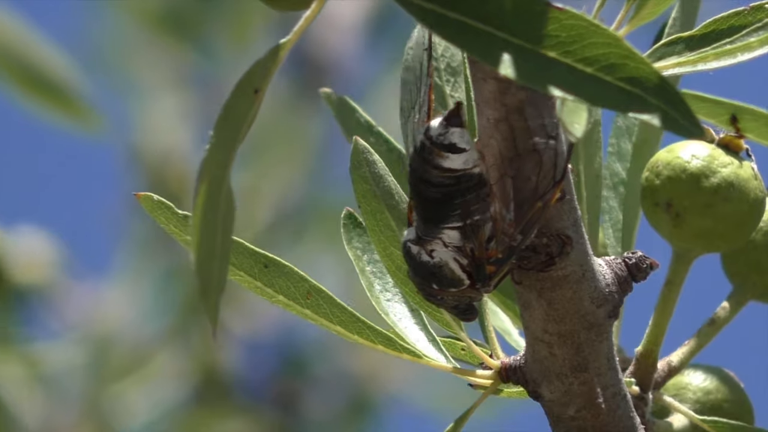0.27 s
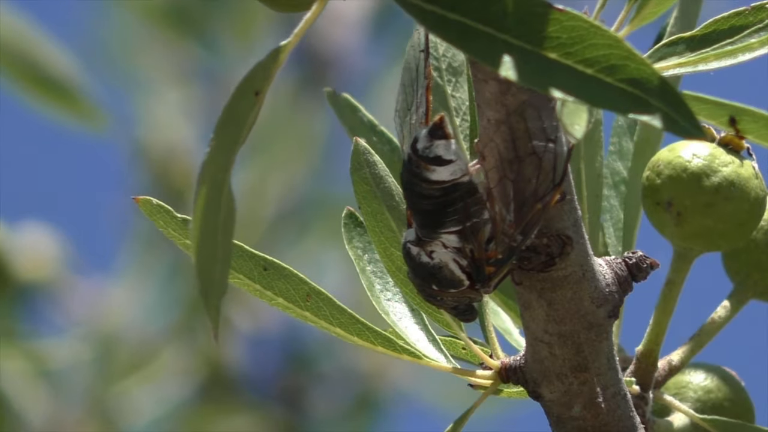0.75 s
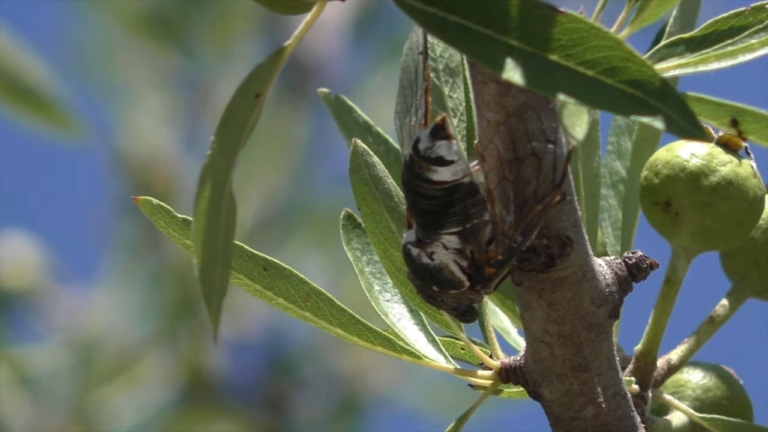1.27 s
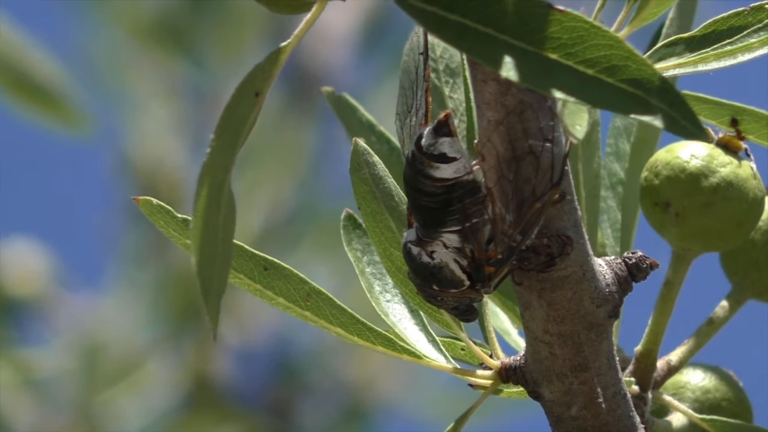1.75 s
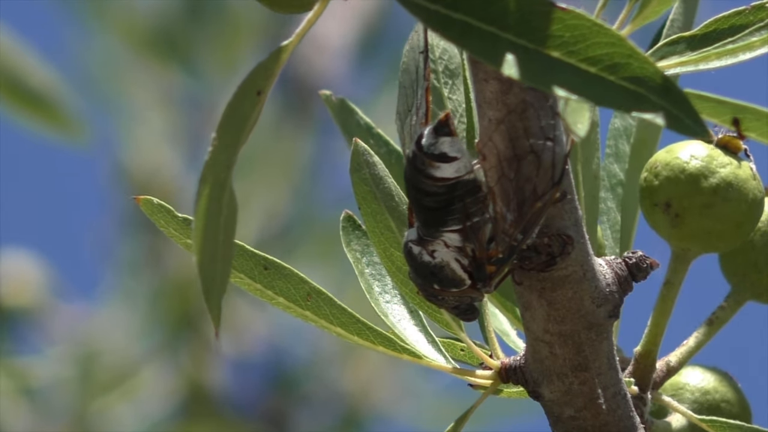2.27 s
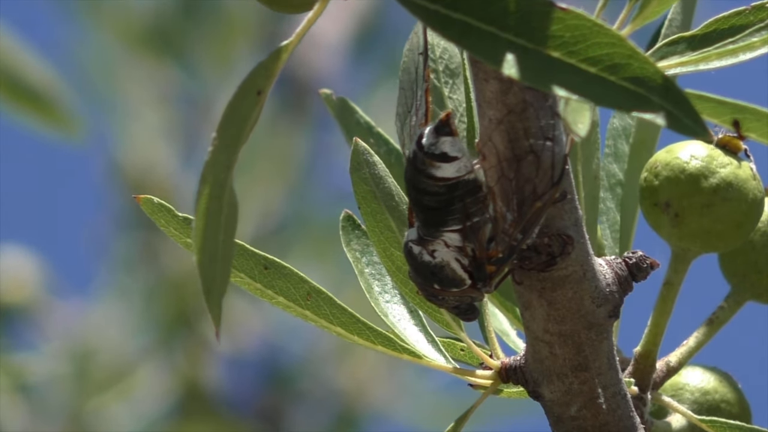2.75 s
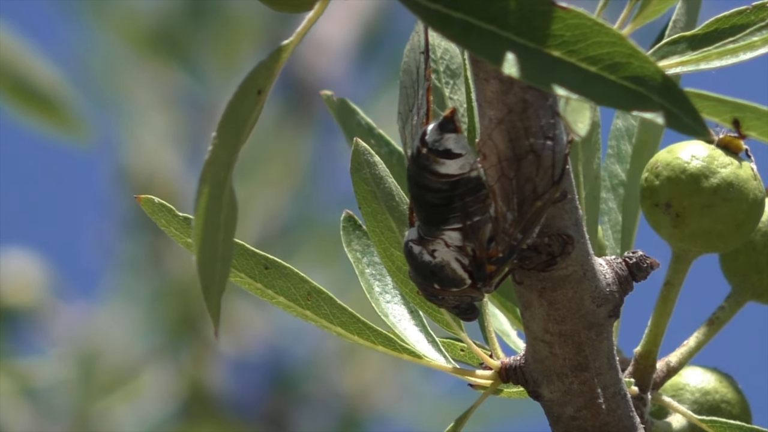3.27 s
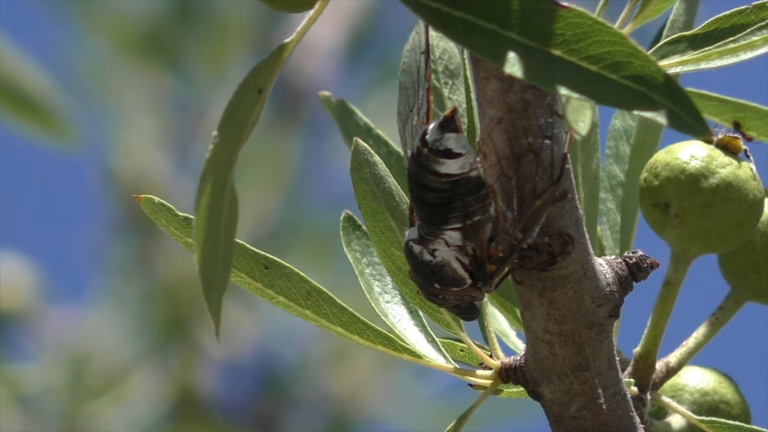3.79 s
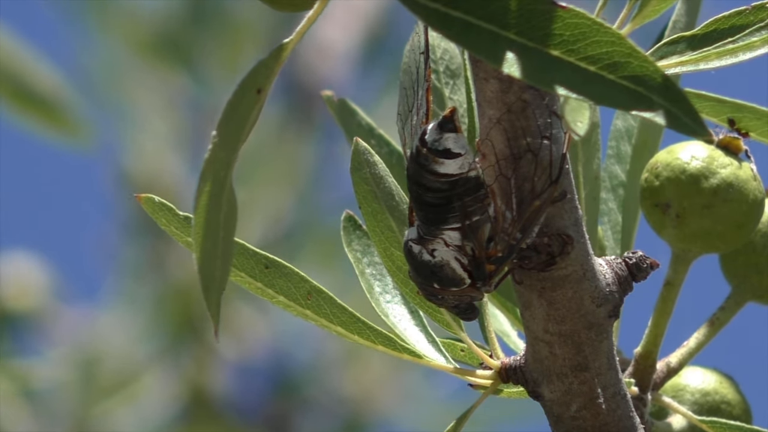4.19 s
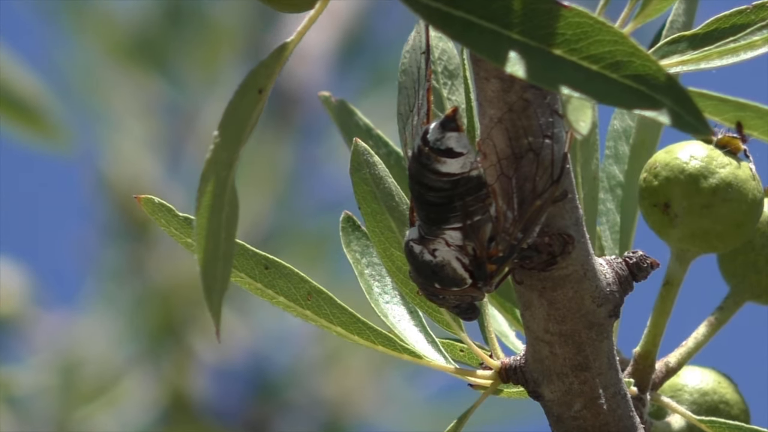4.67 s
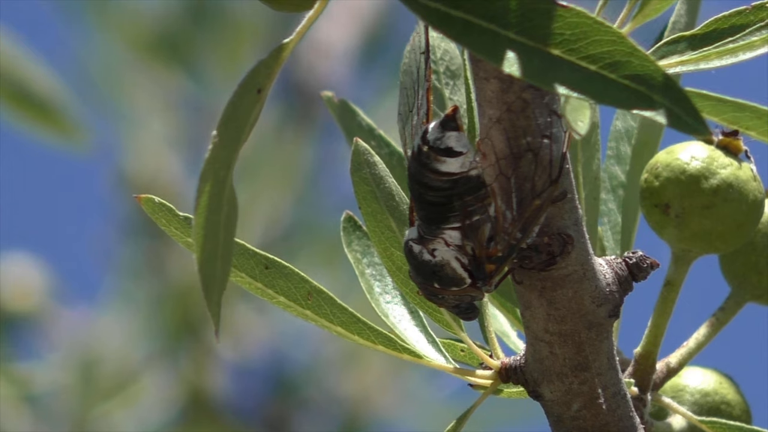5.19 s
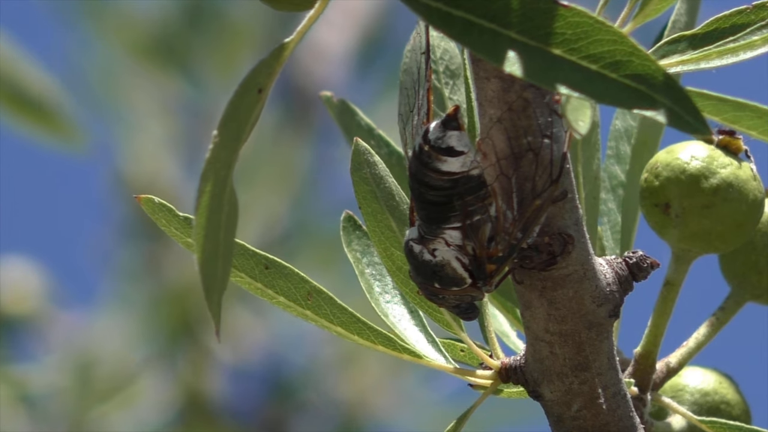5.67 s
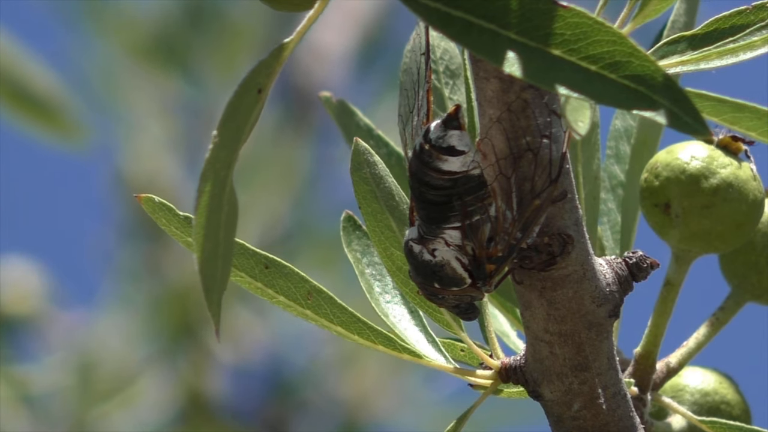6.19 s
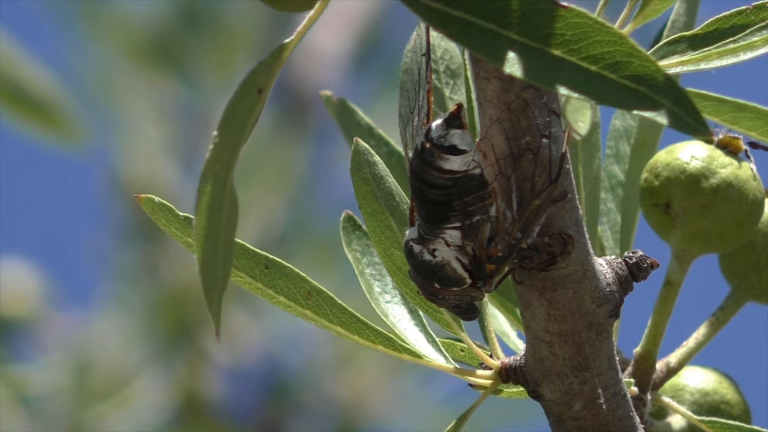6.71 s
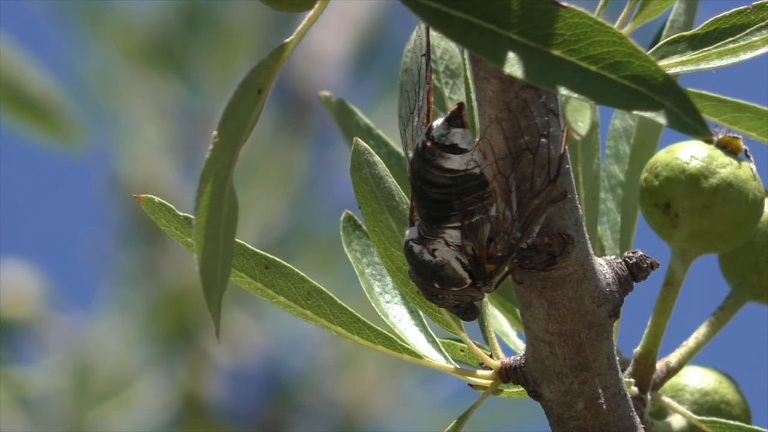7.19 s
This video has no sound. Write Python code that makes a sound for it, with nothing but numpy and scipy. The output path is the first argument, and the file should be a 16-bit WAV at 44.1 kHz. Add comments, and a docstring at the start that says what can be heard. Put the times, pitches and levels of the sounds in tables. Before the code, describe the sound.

From the first moment a cicada sings loudly and very close to the microphone, on a branch among leaves. Its song is a shrill, dry buzz of dense sharp clicks, brightest around 5 to 10 kHz, pulsing about twelve times a second with a small upward pitch sweep in each pulse. From about 2.3 seconds the pulses are more separated, deepest near 4.2. The clicking slows, making the buzz coarser; around 4.8 to 5.2 it is quieter and the throbbing shallow. Distinct pulses return from 5.4 until about 6.35, then the sound holds as an even, rattling buzz to the end at 7.4. Distant cicadas hiss softly all around, rising after 5 seconds. Faint, very high bush-cricket rasps come about twice a second, pausing briefly between roughly 4.5 and 5.1. A very weak low outdoor rumble lies beneath.

```python
"""Cicada on a fruit tree

A cicada sings close to the microphone. Each muscle stroke buckles its tymbals twice; the clicks ring the
hollow abdomen, which pumps about twelve times a second, then holds still as the strokes slow to an even buzz.
Filtered noise makes the hiss of distant cicadas, a bush-cricket's rasps and a low outdoor rumble.
The branch and leaves echo every insect."""
import sys
import numpy as np
from scipy import signal
from scipy.fft import rfft, irfft
from scipy.io import wavfile
from scipy.ndimage import uniform_filter1d

SR = 44100
rng = np.random.default_rng(int(sys.argv[2]) if len(sys.argv) > 2 else 0)


def to_wav(sig):
    """Store sig (one row per channel, or 1-D mono) as 16-bit WAV at the path in sys.argv[1].

    Samples outside -1..1 are clipped; the rate is SR.
    """
    pcm = np.clip(np.atleast_2d(sig), -1, 1) * 32767
    pcm = np.round(pcm).astype(np.int16)
    wavfile.write(sys.argv[1], SR, pcm.T)  # frames by channels


N = 328545
TIME = np.arange(N) / SR

# spectrum of the distant cicadas: [f/Hz, level/dB per Hz]
CHORUS_SPECTRUM = [(1200, -45), (1850, -32), (2150, -15), (2400, -11.5), (2700, -14), (3050, -13),
                   (3850, -15), (4400, 0), (6000, 0.5), (7000, -1.5), (8300, -18.5), (10200, -12),
                   (11500, -17), (13500, -20), (16000, -35)]
# spectrum of the low outdoor rumble: [f/Hz, level/dB per Hz]
RUMBLE_SPECTRUM = [(15, -38), (25, -16), (63, -8), (203, 0), (353, -4), (430, -8), (524, -18.5), (710, -18),
                   (896, -23.5), (1020, -20.5), (1560, -28), (1800, -18), (2340, -20), (3960, -120)]
# left-right difference of the distant sounds: [f/Hz, side level against mid/dB]
STEREO_WIDTH = [(30, -13.5), (90, -16.5), (350, -25.5), (650, -27), (900, -55), (1700, -48), (2200, -25),
                (4300, -27.5), (5400, -32.5), (6000, -99), (9000, -85)]
# background level as heard, rising after about 5 s: [t/s, level/dB]
BACKGROUND_LEVEL = [(0, -27.5), (1.7, -28.5), (3.0, -27.5), (4.2, -28.5), (5.0, -28.5), (5.7, -24.5),
                    (7.45, -23)]
# reflections off the branch and leaves: [delay/ms, gain/1]
ECHOES = [(0.845, 0.011), (1.374, 0.078), (1.412, 0.028), (2.878, 0.3), (2.954, 0.16), (3.051, 0.083)]
# strokes of the tymbal muscle: [t/s, stroke rate/Hz]
STROKE_RATE = [(0, 336.7), (2.5, 330.3), (3.3, 315.9), (4.25, 292.6), (4.6, 258.2), (5.0, 232.2),
               (5.9, 213.9), (6.8, 183.6), (7.45, 176.3)]
# posture: [t/s, tymbal ring f/Hz, glide through a pump/Hz, click-to-click scatter/Hz, ring time/ms,
# flank ring level/dB, upper ring level/dB]
POSTURE = [(0, 6510, 2100, 330, 0.43, -5.5, -10.5), (1.9, 6520, 2002, 335, 0.44, -5, -9),
           (2.4, 6630, 1697.5, 396, 0.43, -5, -10), (4.2, 6650, 1201, 397, 0.4, -6, -9),
           (4.8, 6580, 395.5, 350, 0.6, -3.5, -4), (5.5, 6630, 98, 300, 0.51, -4, -2.5),
           (6.2, 6570, 0, 250, 0.59, -7, -3.5), (6.7, 6760, -2, 170, 0.48, -9, -6),
           (7.45, 6693, 0, 170, 0.65, -21, -7.5)]
# runs of evenly paced abdominal pumps: [start t/s, pump rate/Hz]; the last row only ends the pumping
PUMP_RUNS = [(-0.016, 12), (0.754, 11.5), (3.187, 11.9), (4.113, 12), (4.69, 13.2), (4.918, 12.5),
             (5.625, 12.5), (6.347, -1)]
# shape of a pump: [t/s, share spent opening/1, share spent closing/1,
# extra muffling of the side rings when shut/dB per dB of dip]
PUMP_SHAPE = [(0, 0.14, 0.62, 0.22), (1.9, 0.087, 0.48, .15), (2.35, 0.068, 0.28, 0.5),
              (3.0, 0.1, 0.3, .42), (3.7, 0.15, 0.26, .35), (4.15, .1, 0.21, 0.45), (4.6, 0.16, 0.46, .3),
              (5.4, 0.065, 0.18, 0.7), (6.35, 0.074, 0.089, 0.49)]
# effort of the song: [t/s, level with the abdomen open/dB, dip when it shuts/dB]
EFFORT = [(0, -12.5, 6.5), (0.4, -13, 6), (0.75, -14, 5.5), (1.0, -14, 6.5), (1.88, -15.5, 6),
          (2.24, -13.5, 6), (2.31, -15, 10), (2.9, -14, 7.5), (3.5, -13.5, 9.5), (4.2, -15.5, 13),
          (4.5, -16.5, 6.5), (4.8, -20, 2.5), (5.2, -18.5, 4), (5.45, -17.5, 9), (5.8, -16, 6.5),
          (6.3, -15, 9), (6.38, -13.5, 1.5), (7.45, -15, -0.5)]
# radiation of the body: [f/Hz, level/dB]
BODY_RADIATION = [(1000, -47.5), (3000, -39.5), (3900, -11.5), (4350, -6.5), (5000, -2.5), (6500, -0.5),
                  (7200, 2), (8200, 0), (9000, -1.5), (10300, -2.5), (11300, -5), (13300, -2), (15500, -2)]
# air modes of the abdomen: [f/Hz, bandwidth/Hz, level/dB]
CAVITY_MODES = [(4445, 230, -5.5), (5016, 210, -3.5), (5763, 154, 2), (6403, 150, 1), (7108, 167, 1.5),
                (7776, 296, -2.5), (8556, 330, -2), (9180, 280, -1.5), (9840, 170, -2), (10380, 560, -5.5),
                (13600, 200, -5), (15100, 180, -7), (15400, 220, -9)]
# wing resonance of the bush-cricket: [f/Hz, level/dB]
WING_RESONANCE = [(8000, -53), (10300, -0.5), (11400, -6.5), (12100, -8.5), (12900, -14), (13600, -21),
                  (16000, -31)]
# bouts of evenly paced rasps: [first rasp t/s, last rasp t/s, rasp rate/Hz, level/dB, growth/dB per s,
# half length of a rasp/s]
RASP_BOUTS = [(0.02, 4.45, 2.26, -33.5, 0.06, 0.056), (5.14, 7.9, 2.06, -37.5, 3, 0.076)]


def undb(db):
    """Level and amplitude: 20 dB is a factor of ten in gain."""
    return 10 ** (np.asarray(db) / 20)


def unit(x):
    """Normalization: scale a signal to an rms of 1."""
    return x / np.sqrt(np.mean(x ** 2))


def curves(table, at):
    """Linear interpolation: read every column of a table at the given times."""
    s, *columns = np.transpose(table)
    return [np.interp(at, s, column) for column in columns]


def colour(x, points):
    """Minimum-phase filtering: a causal response follows (f/Hz, level/dB) points."""
    size = 4096
    hz, db = np.transpose(points)
    bins = np.maximum(np.arange(size // 2 + 1) * SR / size, 1)
    level = np.interp(np.log(bins), np.log(hz), db)
    # folding the cepstrum onto positive times makes the filter causal
    cepstrum = irfft(np.log(undb(level)))
    cepstrum[1:size // 2] *= 2
    cepstrum[size // 2 + 1:] = 0
    response = irfft(np.exp(rfft(cepstrum)))
    return signal.fftconvolve(x, response)[:N]


def walk(rate):
    """Slow random modulation: smoothed noise, spread near 1, changes about `rate` times a second."""
    step = int(SR / rate)
    held = np.repeat(rng.standard_normal(N // step + 1), step)
    return unit(uniform_filter1d(held, step)[:N])


def paced(start, end, rate):
    """Periodicity: evenly spaced times from start to end, about `rate` a second."""
    return np.linspace(start, end, int(round((end - start) * rate)) + 1)


def distant(spectrum):
    """Diffuse field: noise from all around is almost alike left and right."""
    mid, side = (unit(colour(rng.standard_normal(N), spectrum)) for _ in range(2))
    return mid + colour(side, STEREO_WIDTH) * np.array([[1], [-1]])


def foliage(x, scatter_db=-10, scatter_s=0.0063):
    """Reflection and scattering: a few near echoes, and a short spray of faint ones from the leaves."""
    size = 2048
    age = np.arange(size) / SR
    hz = np.arange(size // 2 + 1) * SR / size
    # a delay is a phase slope, so echoes may fall between samples
    near = 1 + sum(gain * np.exp(-2j * np.pi * hz * ms / 1000) for ms, gain in ECHOES)
    envelope = np.exp(-age / scatter_s) * np.minimum(age / scatter_s, 1)
    spray = rng.standard_normal(size) * envelope
    response = irfft(near) + undb(scatter_db) * spray / np.linalg.norm(spray)
    return signal.fftconvolve(np.atleast_2d(x), response[None])[:, :N]


def chorus(waver_db=1.3):
    """Incoherent superposition: many distant cicadas merge into a wavering hiss."""
    level_db = curves(BACKGROUND_LEVEL, TIME)[0] + waver_db * walk(rate=14)
    return unit(foliage(distant(CHORUS_SPECTRUM))) * undb(level_db)


def rumble(against_chorus_db=-23, flutter_db=0.5):
    """Broadband noise: a low outdoor rumble swells gently."""
    level_db = against_chorus_db + curves(BACKGROUND_LEVEL, TIME)[0] + flutter_db * walk(rate=8)
    return distant(RUMBLE_SPECTRUM) * undb(level_db)


def pump_phase(at):
    """Cyclic phase: how far the abdomen is through its present pump, 0-1."""
    runs = [paced(start, end, rate) for (start, rate), (end, _) in zip(PUMP_RUNS, PUMP_RUNS[1:])]
    starts = np.unique(np.concatenate(runs))
    return np.interp(at, starts, np.arange(len(starts))) % 1


def pump_dip(opens_at=0.092, shuts_at=0.97):
    """Aperture loss: decibels lost while shut; in each pump it opens early, then closes by `shuts_at`."""
    opening, closing, _ = np.maximum(curves(PUMP_SHAPE, TIME), .01)
    phase = pump_phase(TIME)
    gape = np.clip(np.minimum((phase - opens_at) / opening, (shuts_at - phase) / closing), 0, 1)
    shut = np.cos(np.pi / 2 * gape) ** 2
    return shut * curves(EFFORT, TIME)[1]


def click_times(rib_gap_s=.00156, hurry=.07, stroke_jitter=.025, rib_jitter_s=.00007):
    """Buckling: two clicks for each muscle stroke; the strokes hurry in the middle of a deep pump."""
    rate, = curves(STROKE_RATE, TIME)
    glide = curves(POSTURE, TIME)[1]
    depth = glide / glide.max()
    rate = rate * (1 + hurry * depth * (np.sin(np.pi * pump_phase(TIME)) - .7))
    # a stroke falls at each whole turn of the accumulated rate
    turns = np.cumsum(rate * (1 + stroke_jitter * walk(rate=250))) / SR
    first = np.interp(np.arange(1, int(turns[-1])), turns, TIME)
    gap = np.minimum(rib_gap_s, .5 / np.interp(first, TIME, rate))  # at most half a stroke
    times = np.stack([first, first + gap], axis=1).ravel()
    return np.abs(times + rib_jitter_s * rng.standard_normal(len(times)))


def rings(times, hz, size, decay_s, rise_s):
    """Damped free oscillation: each click rings once, with its own pitch, size and phase."""
    index = (times * SR).astype(int)[:, None] + np.arange(1, 161)
    age = index / SR - times[:, None]
    wave = np.sin(2 * np.pi * (hz[:, None] * age + rng.random((len(times), 1))))
    shape = np.exp(-age / np.reshape(decay_s, (-1, 1))) * (1 - np.exp(-age / rise_s))
    rung = size[:, None] * shape * wave
    return unit(np.bincount(index.ravel(), rung.ravel(), N)[:N])


def cavity(x, direct_db=-9):
    """Cavity resonance: clicks leak out directly and set the air in the abdomen ringing."""
    modes = sum(undb(db) * signal.lfilter(*signal.iirpeak(hz, hz / width, fs=SR), x)
                for hz, width, db in CAVITY_MODES)
    return undb(direct_db) * x + modes


def cicada(click_spread_db=0.5, second_db=0.5, second_decay=0.77,
           rasp_db=-13, high_flank_db=-1, uneven_db=0.29):
    """Impulsive excitation: clicks ring the abdomen; pumps open it, lift their pitch and free the sound."""
    times = click_times()
    centre, glide, scatter, ring_ms, _, _ = curves(POSTURE, times)
    size_chance, main_chance, low_chance, high_chance, upper_chance = rng.standard_normal((5, len(times)))
    second = np.arange(len(times)) % 2  # the second rib of a stroke rings shorter
    size = undb(click_spread_db * size_chance + second_db * second)
    ring_s = ring_ms / 1000 * np.where(second, second_decay, 1)
    main_hz = centre + glide * (pump_phase(times) - .5) + scatter * main_chance
    main = rings(times, main_hz, size, decay_s=ring_s, rise_s=.00007)
    # weaker rings flank the main one, and a higher one makes the shrill top
    low = rings(times, 4950 + 250 * low_chance, size, decay_s=0.00071, rise_s=.00009)
    high = rings(times, 8000 + 250 * high_chance, size, decay_s=0.00081, rise_s=.00007)
    upper = rings(times, 9800 + 400 * upper_chance, size, decay_s=0.00045, rise_s=.00006)
    # the membrane rasps for as long as it rings
    envelope = np.abs(signal.hilbert(main))
    rasp = unit(np.sqrt(envelope) * rng.standard_normal(N))
    *_, flank_db, upper_db = curves(POSTURE, TIME)
    dip, muffling = pump_dip(), curves(PUMP_SHAPE, TIME)[2]
    flanks = undb(flank_db) * (low + undb(high_flank_db) * high)
    # the main ring leaks best through a shut abdomen
    rest = (flanks + undb(upper_db) * upper + undb(rasp_db) * rasp) * undb(-muffling * dip)
    radiated = cavity(colour(main + rest, BODY_RADIATION))
    level_db = curves(EFFORT, TIME)[0] + uneven_db * walk(rate=12) - dip
    return unit(foliage(radiated)) * undb(level_db)


def bush_cricket(grain_db=0.0):
    """Stridulation: noise shaped by a wing resonance makes soft, very high rasps, about two a second."""
    swell = np.zeros(N)
    for first, last, rate, db, growth, half in RASP_BOUTS:
        for s in paced(first, last, rate):
            swell += undb(db + growth * (s - first)) * np.exp(-.5 * ((TIME - s) / half) ** 2)
    scrape = colour(rng.standard_normal(N), WING_RESONANCE) * undb(grain_db * walk(rate=450))
    return unit(foliage(scrape)) * swell


def scene():
    """Linear superposition: cicada and bush-cricket straight ahead, chorus and rumble spread around."""
    return chorus() + rumble() + cicada() + bush_cricket()


def record(dry, ceiling=0.78, top_hz=15710):
    """Clipping and band limitation: the sharpest clicks overload the microphone; the top is cut."""
    clipped = np.clip(dry, -ceiling, ceiling)
    low_pass = signal.ellip(10, .2, 80, top_hz, fs=SR, output="sos")
    return signal.sosfilt(low_pass, clipped)


dry = scene()
out = record(dry)
to_wav(out)
```